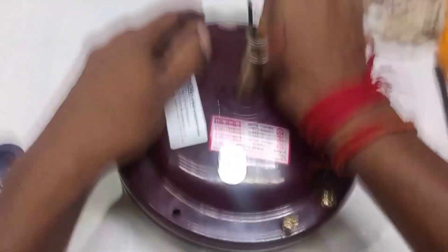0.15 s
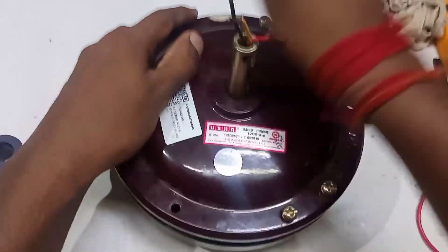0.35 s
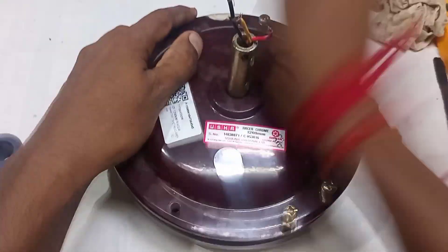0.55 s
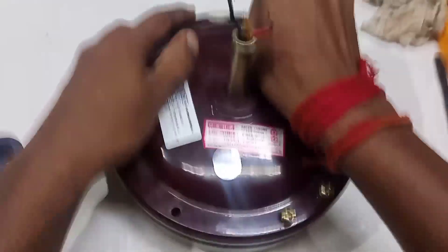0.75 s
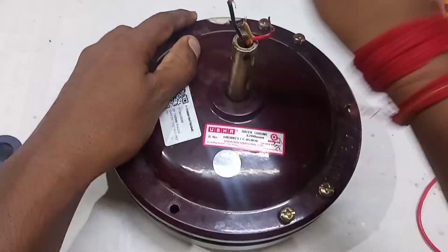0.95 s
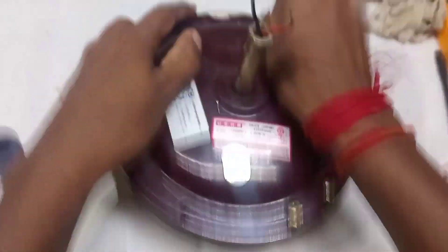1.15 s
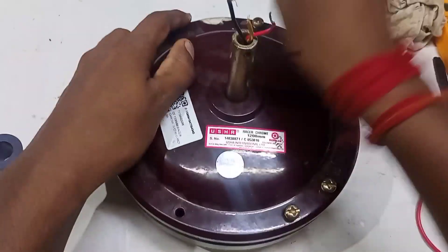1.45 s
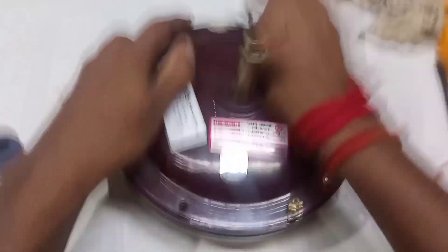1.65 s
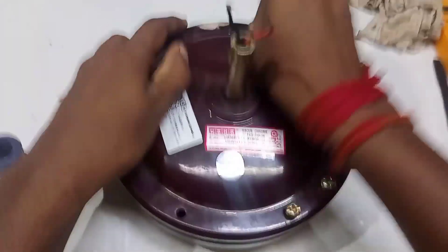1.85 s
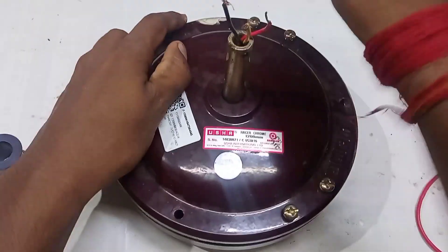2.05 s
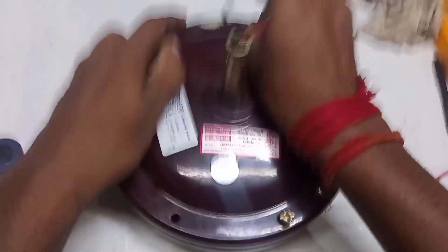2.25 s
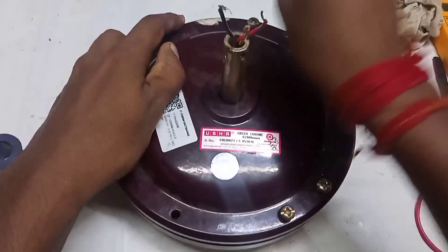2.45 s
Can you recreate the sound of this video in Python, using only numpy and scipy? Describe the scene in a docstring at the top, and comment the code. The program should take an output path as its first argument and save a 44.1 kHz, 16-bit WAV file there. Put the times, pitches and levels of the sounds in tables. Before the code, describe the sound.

Loud, dry metal knocks land about every half second, with a light extra hit after the first. Loose parts tick as the motor rocks back; faint room air and a thin high whine continue, miked closely.

```python
"""A faint hum, room air and a slowly growing high whine, all shaped noise, run throughout.
A hand slaps the metal cover of a ceiling-fan motor into place on a workbench: six blows, soon two a second.
Each blow rings the hollow cover and the bench as fading sine tones and rattles the loose rim with uneven noise.
After most blows the motor rocks back and loose parts tick; a small hard room answers with fading noise.
A brief reedy tone of stacked sines comes early on, then narrow noise squeaks; a limiter holds down the peaks."""
import sys
import numpy as np
from scipy import signal
from scipy.fft import rfft, irfft
from scipy.io import wavfile
from scipy.ndimage import uniform_filter1d, minimum_filter1d, map_coordinates

SR = 44100
rng = np.random.default_rng(int(sys.argv[2]) if len(sys.argv) > 2 else 0)


def store_wav(level_fs):
    """Save 16-bit WAV to argv[1]."""
    pcm = np.round(np.clip(np.atleast_2d(level_fs), -1, 1) * 32767)
    wavfile.write(sys.argv[1], SR, pcm.T.astype(np.int16))


N = 114660  # length of the sound in samples

# steady room air: (frequency [Hz], level per Hz [dB])
AIR_SPECTRUM = [(25, -11), (80, 6.5), (200, -6), (400, -3.5), (700, -1), (1200, -10.5), (1750, -6),
                (2100, -17.5), (7500, -23), (16000, -28)]
# high whine: (frequency [Hz], level per Hz [dB])
WHINE_SPECTRUM = [(100, -55), (8200, -27), (9300, -1), (9850, 6), (10500, -3.5), (12000, -40)]
# low hum: (frequency [Hz], level per Hz [dB])
HUM_SPECTRUM = [(25, -28), (70, -17), (150, -15), (185, -7), (205, 0), (228, -9), (260, -19), (330, -27),
                (1000, -50)]
# how the hum comes and goes: (time [s], level [dB])
HUM_LEVEL = [(0, -54), (.17, -67.5), (.55, -57), (.68, -65.5), (1.1, -73.5), (1.65, -78), (1.95, -59.5),
             (2.12, -59), (2.2, -71.5), (2.4, -48.5), (2.6, -64)]
# blows on the cover: (time [s], knock level [dB], knock pitch [ratio], knock tilt [dB per octave],
# knock decay [ratio], bench thud level [dB], chatter level before CHATTER_DB or TOUCH_DB [dB],
# chatter fade by 60 dB [s], chatter tilt [dB per octave], ring level [dB], ring pitch [ratio],
# room level for knock and chatter before ROOM_DB [dB])
BLOWS = [(0.2157, -2.5, 0.96, 6, 0.85, -15, -15.5, 0.047, -.5, -52, 1.3, -7),
         (0.3821, -20.5, .98, 4, 2.1, -30, -25, 0.083, 2, -38.5, 1.17, -15),
         (0.6959, 4, 0.909, 3.5, .55, -30, -17, 0.04, 0.7, -43.5, 1.3, -7),
         (1.2093, -7, 0.876, 16, 0.73, -22.5, -16, 0.065, -0.4, -35, 0.99, -9),
         (1.739, -1.5, .99, -3.5, 1.35, -14, -16.5, 0.078, -1.3, -28, .998, -7.5),
         (2.2406, 2.5, 0.98, -2, 0.62, -15.5, -13.5, 0.05, -1.03, -29, 1.002, -7)]
# tones of the hollow cover, damped by the hands, before pitch and decay ratios:
# (frequency [Hz], level [dB], fade by 60 dB [s])
COVER_TONES = [(318, -19, .06), (430, -14, .02), (560, -4, .036), (668, -3, .038), (790, -15, .018),
               (915, -13, .032), (1050, -9.5, .05), (1180, -25, .025)]
# tones of the motor on the bench top: (frequency [Hz], level [dB], fade by 60 dB [s])
BENCH_TONES = [(70.4, -17, 0.05), (106, -9, .2), (126.7, -11.5, .17), (143.7, 7.5, 0.036), (175.7, -2, .2),
               (198.6, -9.5, .35)]
# tones of the free metal rim, before the pitch ratio: (frequency [Hz], level [dB], fade by 60 dB [s])
RIM_TONES = [(1440, -8, .2), (1625, -6, .22), (1785, -8, .2), (1900, -3, .17), (2095, -9, .17),
             (3378, -2, .2), (3448, 2, .22), (3560, -5, .18), (3658, 0, .21), (3781, -3, .2),
             (3960, -9, .17), (4990, -10, .18)]
# metal chatter, before any tilt: (frequency [Hz], level per Hz [dB])
CHATTER_SPECTRUM = [(30, -31.5), (100, -9.5), (400, 10.5), (1000, 11), (1450, 3), (2700, 0), (4000, 1),
                    (4800, -3), (5700, 2.5), (7600, -10.5), (8800, -10), (9800, -1), (11000, -11.5),
                    (13700, -17), (15000, -5), (15800, -18)]
# how long the room rings: (frequency [Hz], fade by 60 dB [s])
ROOM_FADE = [(80, 0.46), (200, 0.82), (560, 0.35), (1500, 0.39), (4000, 0.31), (10000, .3), (15000, .26)]
# which pitches the room favours: (frequency [Hz], level [dB])
ROOM_COLOUR = [(60, -3), (200, -5), (400, -3.5), (1000, -2.5), (4000, 3), (10000, -3.5), (15000, -2)]
# the motor rocks back on the bench: (time [s], thud level [dB], knock level [dB], chatter level [dB])
ROCKS = [(.262, -38, -26.5, -44), (.738, -28, -23.5, -34.5), (0.755, -30, -11, -25),
         (1.273, -32.5, -23, -35), (1.786, -30.5, -25, -26), (2.29, -31, -33, -35.5)]
# small ticks of the rim and its screws: (time [s], level [dB])
TICKS = [(.283, -39.5), (1.802, -37), (1.834, -44), (2.305, -33), (2.379, -38.5)]
# a brief reedy tone: (harmonic number [multiple of TONE_HZ], level before TONE_DB [dB])
TONE_HARMONICS = [(1, -10.5), (2, -0.5), (3, -13), (4, -11.5), (5, -25.5), (6, -13), (8, -14), (9, -18.5),
                  (13, -16.5)]
# narrow squeaks and rubs: (time [s], length [s], centre [Hz], width [Hz], level before the swell [dB])
RUBS = [(0.951, 0.21, 1110, 605, -72), (1.037, 0.065, 3900, 900, -73.5), (1.441, 0.039, 6100, 300, -70.5),
        (1.456, 0.048, 1740, 131, -67.5), (1.5, 0.17, 1480, 350, -73), (1.943, 0.019, 6100, 250, -65.5),
        (2.157, 0.03, 1670, 300, -72.5), (2.435, 0.026, 6050, 250, -62), (2.563, 0.035, 1726, 162, -69.5)]

AIR_DB, WHINE_START_DB, WHINE_GROWS_DB_PER_S = -77.5, -81, 2.5
KNOCK_PIVOT_HZ = 650  # the knock's tilt leaves this pitch alone
KNOCK_RISE_S, CHATTER_RISE_S, RING_RISE_S, THUD_RISE_S = .0018, .0038, .0029, .0035
TOUCH_LEAD_S, TOUCH_DB, TOUCH_FADE_S = .0022, -2, .0067
CHATTER_GRAIN_HZ, CHATTER_SPREAD_DB, CHATTER_DB = 1548, 3, 8
WANDER_RAD, WANDER_HZ = .4, 70  # size of the phase wander, and how often it gets a new value
ROOM_DB, ROOM_RISE_S = 4.5, .016  # ROOM_DB is added to every room level
RING_ROOM_DB, THUD_ROOM_DB, SETTLE_ROOM_DB = -8.5, -13.5, -10.5
SETTLE_RISE_S, ROCK_CHATTER_FADE_S = .0017, .09
TICK_FADE_S, TICK_TILT_DB_PER_OCTAVE = .075, 2
TONE_S, TONE_LENGTH_S, TONE_HZ, TONE_DB = .595, .125, 435, -65
LOW_CUT_HZ, TOP_HZ = 78, 15550
CEILING, RELEASE_S = .56, .015  # limiter: level it starts at [1 = full scale], recovery time


def amp(db):
    """Turn decibels into a plain multiplier."""
    return 10 ** (np.asarray(db) / 20)


def unit(x):
    """Scale a sound to an average (rms) strength of 1."""
    return x / np.sqrt(np.mean(x ** 2) + 1e-20)


def along(points, hz):
    """Read a table of (Hz, value) at any frequency, spaced as the ear hears pitch."""
    table_hz, values = np.transpose(points)
    return np.interp(np.log(hz + 1), np.log(table_hz + 1), values)


def clock():
    """Count the seconds since a sound began, for one second."""
    return np.arange(SR) / SR


def add(track, s, sound):
    """Mix a sound into the track at time s, cutting it off at the end."""
    part = track[max(round(s * SR), 0):][:len(sound)]
    part += sound[:len(part)]


def noise(spectrum, size, tilt_db=0):
    """Shape random hiss to a spectrum at rms 1, tilting it per octave above 1 kHz."""
    hz = np.fft.rfftfreq(size, 1 / SR)
    octaves = np.log2(np.maximum(hz, 1000) / 1000)
    shape = amp(along(spectrum, hz) + tilt_db * octaves)
    return unit(irfft(rfft(rng.standard_normal(size)) * shape, size))


def workshop():
    """Room air, a low hum that comes and goes, and a hissy whine that slowly grows, all shaped noise."""
    t = np.arange(N) / SR
    hum = amp(np.interp(t, *np.transpose(HUM_LEVEL))) * noise(HUM_SPECTRUM, N)
    air = amp(AIR_DB) * noise(AIR_SPECTRUM, N)
    whine = amp(WHINE_START_DB + WHINE_GROWS_DB_PER_S * t) * noise(WHINE_SPECTRUM, N)
    return hum + air + whine


def fade(rise, t60):
    """A struck object's loudness: a rounded start, then a steady fade of 60 dB in t60 seconds."""
    return (1 - np.exp(-clock() / rise)) * 1000 ** (-clock() / t60)


def chatter(rise, t60, tilt_db=0):
    """Metal rattling on metal: noise whose level jumps about at random, like a cluster of uneven contacts."""
    grain = map_coordinates(rng.standard_normal(SR), [clock() * CHATTER_GRAIN_HZ], order=1)
    uneven = noise(CHATTER_SPECTRUM, SR, tilt_db) * amp(CHATTER_SPREAD_DB * grain)
    return unit(uneven) * fade(rise, t60)


def ring(tones, rise, pitch=1, scatter_db=2.5, wander=0):
    """Struck metal or wood: fading tones of slightly random strength; loose seating makes the phase wander."""
    t, out = clock(), 0
    for hz, db, t60 in tones:
        drift = wander * np.interp(t * WANDER_HZ, np.arange(256), rng.standard_normal(256))
        strength = amp(db + scatter_db * rng.standard_normal())
        out = out + strength * fade(rise, t60) * np.sin(2 * np.pi * hz * pitch * t + drift)
    return out


def in_room(x, room_db):
    """A contact plus the walls' answer: fading noise that takes on the contact's broad colour."""
    power = np.abs(uniform_filter1d(np.abs(rfft(x)) ** 2, size=90))
    colour = np.sqrt(power) * amp(along(ROOM_COLOUR, np.fft.rfftfreq(SR, 1 / SR)))
    coloured_noise = irfft(rfft(rng.standard_normal(SR)) * colour, SR)
    # split into short slices so that each pitch can fade at its own speed
    hz, t, slices = signal.stft(coloured_noise, SR, nperseg=256)
    t60 = along(ROOM_FADE, hz)[:, None]
    # the square root keeps a long fade from carrying more energy than a short one
    decay = 1000 ** (-t / t60) * np.sqrt(2 * np.log(1000) / (t60 * SR))
    tail = signal.istft(slices * decay, SR, nperseg=256)[1][:SR]
    return x + amp(room_db + ROOM_DB) * tail * (1 - np.exp(-clock() / ROOM_RISE_S))


def blows():
    """A light first touch, then knock, thud, chatter and rim ring; the cover's seating sets knock and ring pitch."""
    out = np.zeros(N)
    for (s, knock_db, pitch, knock_tilt_db, decay, thud_db, chatter_db,
         chatter_t60, tilt_db, ring_db, ring_pitch, room_db) in BLOWS:
        touch = amp(chatter_db + TOUCH_DB) * chatter(KNOCK_RISE_S, TOUCH_FADE_S)
        add(out, s - TOUCH_LEAD_S, touch)

        cover = [(hz, db + knock_tilt_db * np.log2(hz / KNOCK_PIVOT_HZ), t60 * decay)
                 for hz, db, t60 in COVER_TONES]
        knock = amp(knock_db) * ring(cover, KNOCK_RISE_S, pitch, scatter_db=.5)
        rattle = amp(chatter_db + CHATTER_DB) * chatter(CHATTER_RISE_S, chatter_t60, tilt_db)
        add(out, s, in_room(knock + rattle, room_db))

        rim = ring(RIM_TONES, RING_RISE_S, ring_pitch, scatter_db=.5, wander=WANDER_RAD)
        add(out, s, in_room(amp(ring_db) * rim, RING_ROOM_DB))

        thud = amp(thud_db) * ring(BENCH_TONES, THUD_RISE_S, wander=WANDER_RAD)
        add(out, s, in_room(thud, THUD_ROOM_DB))
    return out


def settling():
    """The motor rocks back, softly sounding bench, cover and rim; loose parts tick as short chatter."""
    out = np.zeros(N)
    for s, thud_db, knock_db, chatter_db in ROCKS:
        thud = amp(thud_db) * ring(BENCH_TONES, SETTLE_RISE_S)
        knock = amp(knock_db) * ring(COVER_TONES, SETTLE_RISE_S, pitch=.95)
        rattle = amp(chatter_db) * chatter(CHATTER_RISE_S, ROCK_CHATTER_FADE_S)
        add(out, s, in_room(thud + knock + rattle, SETTLE_ROOM_DB))
    for s, db in TICKS:
        tick = amp(db) * chatter(KNOCK_RISE_S, TICK_FADE_S, TICK_TILT_DB_PER_OCTAVE)
        add(out, s, in_room(tick, SETTLE_ROOM_DB))
    return out


def swell(length):
    """Rise smoothly from silence and sink back to it, as half a sine wave."""
    return np.sin(np.pi * np.minimum(clock() / length, 1))


def reedy_tone():
    """One brief, faint tone from far off: sine waves at whole multiples of one pitch."""
    out, tone = np.zeros(N), 0
    for harmonic, db in TONE_HARMONICS:
        cycles = round(harmonic) * TONE_HZ * clock() + rng.random()
        tone = tone + amp(db) * np.sin(2 * np.pi * cycles)
    add(out, TONE_S, amp(TONE_DB) * swell(TONE_LENGTH_S) * tone)
    return out


def rubs():
    """Faint squeaks and rubs: noise kept to a bell-shaped band of pitches, swelling and sinking."""
    out = np.zeros(N)
    for s, length, hz, width, db in RUBS:
        band = np.exp(-.5 * ((np.fft.rfftfreq(SR, 1 / SR) - hz) / width) ** 2)
        squeak = unit(irfft(rfft(rng.standard_normal(SR)) * band, SR))
        add(out, s, amp(db) * swell(length) * squeak)
    return out


def scene():
    """Everything meets at one close microphone, which sheds the deepest bass."""
    air = workshop() + blows() + settling() + reedy_tone() + rubs()
    low_cut = signal.butter(3, LOW_CUT_HZ, "high", fs=SR, output="sos")
    return signal.sosfilt(low_cut, air)[None]


def record(dry):
    """A fast limiter ducks each peak and recovers; a steep low-pass filter ends the treble."""
    t = np.arange(N) / SR
    over = np.log(np.maximum(np.abs(dry[0]) / CEILING, 1)) + 1e-12
    # hold the largest overshoot and let it die away over the release time
    held = np.exp(np.maximum.accumulate(np.log(over) + t / RELEASE_S) - t / RELEASE_S)
    # start ducking a moment before each peak, and round off the change
    gain = uniform_filter1d(minimum_filter1d(np.exp(-held), size=65), size=65)
    treble_cut = signal.ellip(10, .5, 90, TOP_HZ, fs=SR, output="sos")
    return signal.sosfilt(treble_cut, dry * gain)


dry = scene()
out = record(dry)
store_wav(out)
```